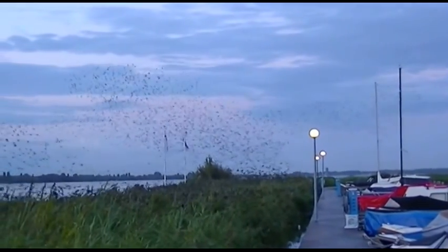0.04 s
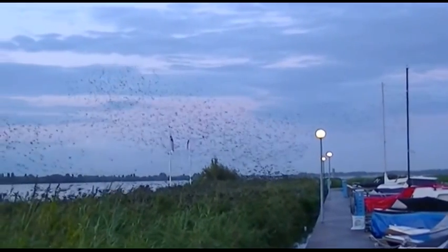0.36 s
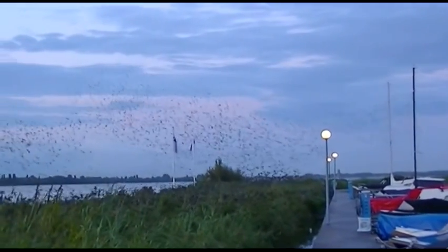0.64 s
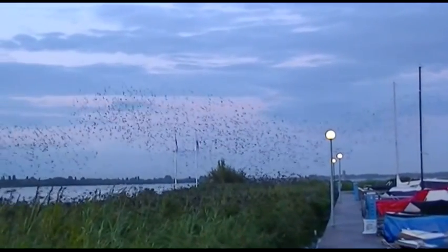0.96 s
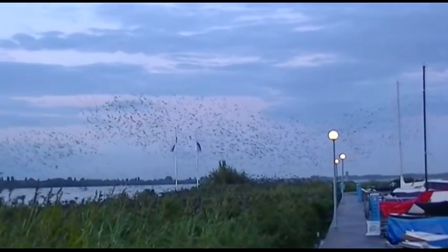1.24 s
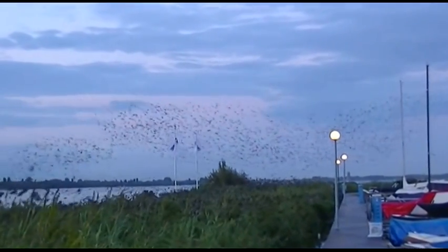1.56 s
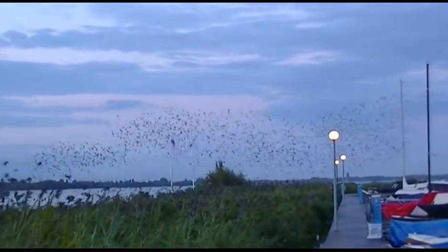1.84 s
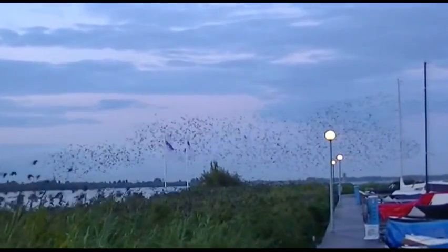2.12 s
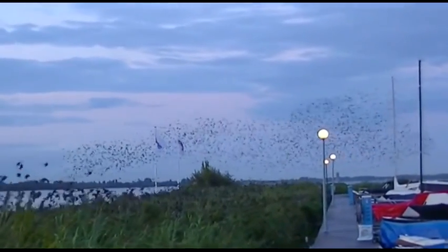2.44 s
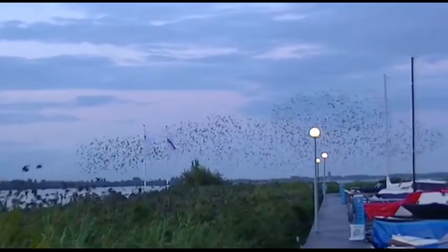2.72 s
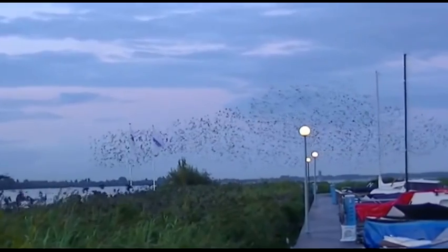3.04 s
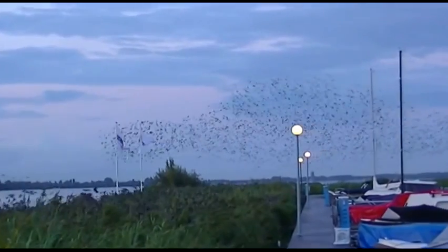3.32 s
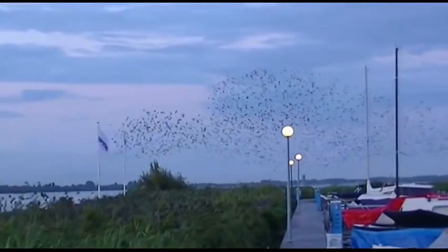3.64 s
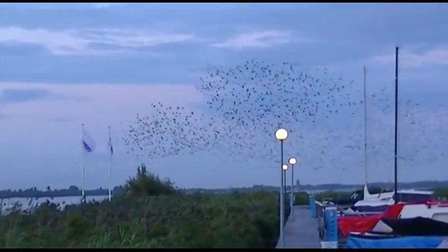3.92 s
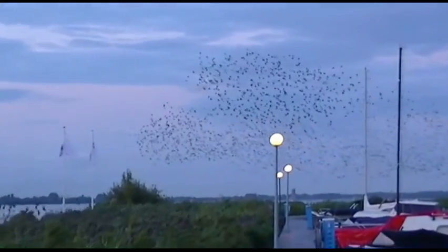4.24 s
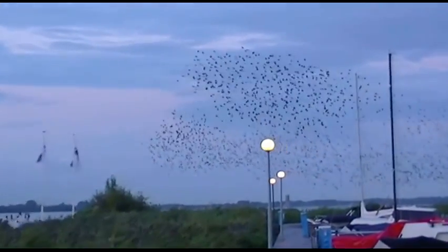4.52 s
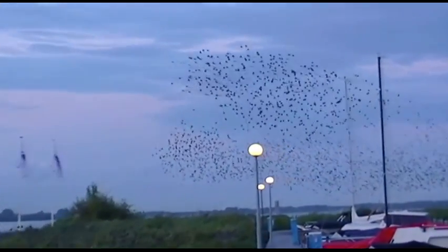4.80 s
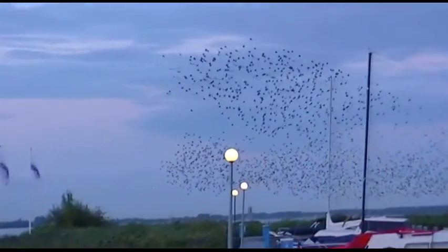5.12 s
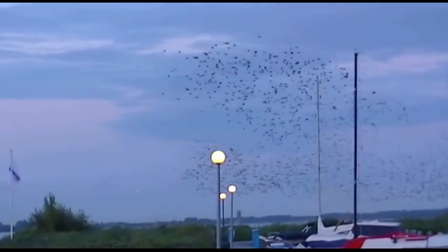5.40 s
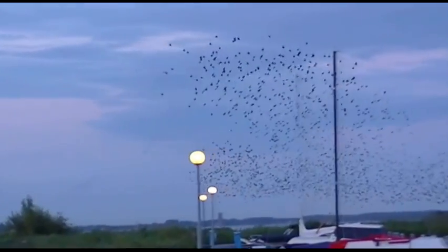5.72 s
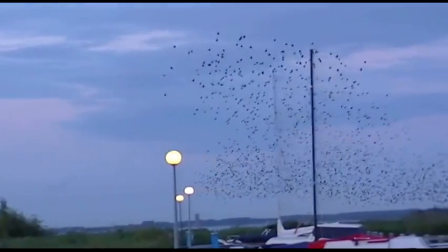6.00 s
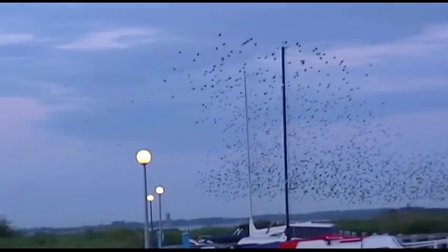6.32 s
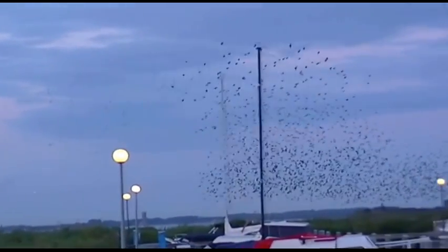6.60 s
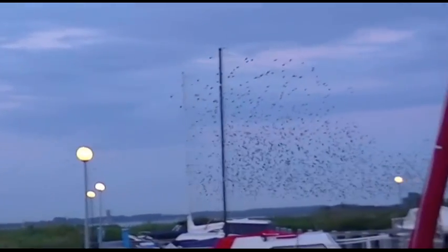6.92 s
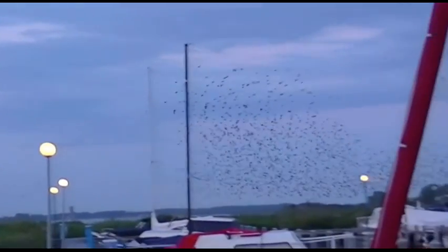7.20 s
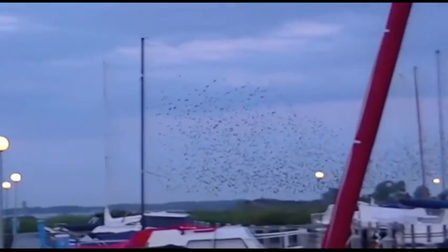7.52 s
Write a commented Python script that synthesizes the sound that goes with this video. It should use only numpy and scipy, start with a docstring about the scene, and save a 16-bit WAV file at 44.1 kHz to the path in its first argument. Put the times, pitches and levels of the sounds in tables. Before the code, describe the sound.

From the start, a huge flock of birds fills the open lakeside air with a dense, continuous rush of wingbeats and hissing feathers, slightly to the left. A few soft wind puffs touch the left of the microphone in the first half second. Thin, very high whistles, quick chirps and buzzy trills from nearer birds come throughout, busier after about 1.5 seconds, over a haze of distant twittering. The hiss and calls swell gently toward 4.6 seconds, then ease a little and drift further left, continuing to the end at nearly 8 seconds. Something hard snaps right beside the microphone three times: lightly at about 2.1 seconds, loudly and sharply at 3.3, and more dully at 4.8. A very faint motor hums far across the water from about 3 to 5.5 seconds.

```python
"""Starling flock from a lakeside jetty

A huge flock sweeps past, a little left of the microphone. Thousands of wingbeats merge into a rush of
pushed air and hissing feathers; the nearer birds whistle and trill above a haze of far calls.
Something hard snaps now and then right beside the microphone, a motor hums far across the water,
and a light wind nudges the microphone ports."""
import sys
import numpy as np
from scipy import signal
from scipy.fft import rfft, irfft, next_fast_len
from scipy.io import wavfile
from scipy.ndimage import uniform_filter1d

SR = 44100
rng = np.random.default_rng(int(sys.argv[2]) if len(sys.argv) > 2 else 0)


def put_to_file(sound):
    """Save the sound as 16-bit audio at rate SR, in the file named by the first command-line argument."""
    columns = np.atleast_2d(sound).T  # one column per channel
    safe = np.clip(columns, -1, 1)
    whole_steps = np.round(safe * 32767)
    wavfile.write(sys.argv[1], SR, whole_steps.astype(np.int16))


N = 341775
TIME = np.arange(N) / SR

# spectrum of the wing strokes: (frequency [Hz], relative level [dB])
STROKE_SPECTRUM = [(24, -63), (40, -31.5), (286, -7.5), (390, -8), (430, -5.5), (757, 0), (975, -0.5),
                   (1280, -4.5), (2250, -1.5), (3200, -5), (3660, -13.5), (4200, -8), (5460, -26),
                   (9240, -120)]
# spectrum of the feather hiss and the sheen above it: (frequency [Hz], relative level [dB])
HISS_SPECTRUM = [(1760, -39), (3000, 1), (3620, -13), (4710, 0.5), (5950, 2.5), (8420, -5.5), (9020, -7.5),
                 (11100, -22), (15700, -32.5)]
# the rustle rises and falls as knots of birds bank by: (time [s], relative level [dB])
BANKING_RUSTLE = [(0.0, -41.5), (3.69, -41), (3.91, -39.5), (4.62, -41), (5.83, -40.5), (6.35, -42.5),
                  (6.73, -41.5), (7.1, -42.5), (7.75, -41.5)]
# thin high whistles, close by: (time [s], length [s], start pitch [Hz], end pitch [Hz], level [dB])
NEAR_WHISTLES = [(0.804, .05, 8600, 8350, -45), (0.928, 0.068, 8200, 8450, -47),
                 (1.62, 0.097, 8250, 8200, -46), (2.162, 0.19, 8800, 8550, -50),
                 (2.29, 0.042, 8800, 8800, -43), (2.328, 0.23, 8370, 8200, -51),
                 (2.393, 0.13, 7860, 7100, -40.5), (2.516, 0.054, 7370, 7250, -46),
                 (3.322, 0.22, 8600, 8300, -51), (3.76, 0.12, 8960, 8840, -46),
                 (3.792, .17, 8100, 7980, -42), (3.992, 0.12, 8660, 8300, -40.5),
                 (4.13, 0.055, 9400, 9400, -61), (4.704, 0.081, 8260, 8760, -42.5),
                 (4.827, .19, 7900, 7390, -42), (4.869, .17, 8860, 8600, -51), (5.43, .13, 9000, 9350, -55),
                 (5.892, 0.13, 8530, 8100, -47.5), (6.225, 0.21, 8670, 8050, -43),
                 (6.252, 0.09, 7950, 7400, -43), (6.272, 0.19, 9270, 9560, -48),
                 (6.48, 0.12, 8400, 8200, -47), (6.688, 0.067, 8230, 8200, -45),
                 (6.839, 0.11, 8740, 8730, -44.5), (7.373, .13, 9200, 9400, -58),
                 (7.584, 0.15, 9040, 8570, -47), (7.597, .09, 8450, 8440, -49)]
# quick slurs, scoops and hooks, close by:
# (time [s], length [s], start pitch [Hz], middle pitch [Hz], end pitch [Hz], level [dB])
NEAR_SLURS = [(.44, 0.043, 6600, 7200, 7600, -44), (.705, 0.028, 4400, 5280, 6100, -47),
              (1.802, 0.055, 5900, 6550, 7550, -41.5), (2.288, .06, 5800, 7130, 7600, -38.5),
              (2.366, .035, 6400, 7300, 7950, -39), (2.724, 0.024, 8000, 8260, 8100, -41),
              (2.735, 0.085, 6100, 5620, 5750, -39.5), (2.811, .055, 5750, 6700, 7200, -39),
              (2.994, .021, 4420, 5200, 6370, -37.5), (3.014, .035, 6350, 5930, 5750, -39.5),
              (3.163, .04, 9000, 7820, 6950, -40), (3.255, 0.052, 7150, 7630, 7240, -43),
              (3.328, 0.027, 6600, 7300, 6460, -38.5), (3.961, 0.17, 6250, 5630, 5500, -40.5),
              (4.101, .075, 5050, 4740, 4660, -42), (4.442, .016, 6650, 5960, 5500, -39),
              (4.711, .063, 4970, 4650, 4560, -43), (5.011, 0.094, 7800, 6300, 5840, -41.5),
              (5.18, 0.053, 6100, 6100, 7100, -38.5), (5.39, 0.094, 5780, 5900, 6400, -39),
              (5.862, 0.09, 6000, 5510, 5250, -37), (6.115, .05, 8000, 7650, 7550, -44),
              (6.153, 0.061, 5400, 5000, 4900, -48), (6.53, 0.046, 7000, 6900, 6700, -45),
              (7.314, 0.037, 4450, 4280, 4900, -43), (7.348, 0.048, 4480, 4420, 4650, -46),
              (7.485, 0.026, 4400, 4500, 4350, -44), (7.53, 0.021, 7100, 7250, 7300, -42),
              (7.547, 0.035, 7750, 8350, 8750, -41)]
# buzzes and warbles, close by; a positive swing stresses the falling sweeps, a negative one the rising:
# (time [s], length [s], start pitch [Hz], end pitch [Hz], level [dB], trill rate [Hz], swing [Hz])
NEAR_TRILLS = [(.005, .04, 4080, 4760, -46, 91, 463), (0.246, 0.026, 6000, 6640, -45, 110, 600),
               (1.519, .1, 6230, 5540, -42.5, 141, 350), (1.705, 0.095, 7200, 6880, -40.5, 66.5, 480),
               (2.86, .11, 7250, 7020, -41, 65, 260), (3.2, 0.056, 6950, 7100, -46, 33, 150),
               (3.323, .045, 5300, 4680, -42.5, 113, 380), (4.428, 0.15, 8000, 7480, -40.5, 128, 600),
               (4.58, 0.13, 6550, 5750, -37.5, 133.5, -350), (4.657, 0.11, 7500, 7750, -43, 130, 550),
               (4.672, 0.058, 5280, 4800, -39, 134, -300), (4.682, 0.055, 9900, 9600, -49, 136, -330),
               (5.126, 0.06, 6680, 6430, -40, 45, 380), (5.32, 0.26, 7560, 7430, -41, 34.05, 200),
               (5.737, 0.11, 7660, 6160, -40.5, 111, 262), (5.829, .065, 6550, 5950, -36.5, 111, 340),
               (6.585, .115, 7400, 7700, -43, 60, 170), (6.792, 0.085, 5650, 5200, -43, 110, 360),
               (7.247, 0.044, 5700, 6900, -42, 122, -480), (7.31, 0.055, 5880, 7280, -41, 121, -380),
               (7.275, 0.048, 4600, 4870, -44, 65, -340)]
# snaps beside the microphone: (time [s], peak level [dB], left minus right [dB], upper band edge [Hz])
CLOSE_SNAPS = [(2.096, -25, 0, 11000), (3.3026, -7.5, -4, 13400), (4.8436, -18.5, -6, 6030)]
# resonances of the snapping thing: (frequency [Hz], bandwidth [Hz], relative level [dB])
SNAP_RESONANCES = [(1200, 180, -8.5), (1615, 120, -8), (2135, 175, -2), (2640, 260, 2), (3230, 180, -3.5),
                   (4060, 220, -10.5), (5250, 340, 1), (5570, 350, -3), (6700, 450, -21), (7380, 450, 0),
                   (7640, 440, -17), (9500, 700, -11)]
# a motor far across the water: (time [s], pitch [Hz], level [dB])
MOTOR_HUM = [(2.5, 432, -80), (2.9, 424.4, -55), (3.8, 434, -54.5), (4.6, 440, -66), (5.3, 442.6, -56.5),
             (6.0, 443, -79)]
# wind puffs on the left microphone port: (time [s], half length [s], peak before filtering [dB])
WIND_PUFFS = [(0.183, 0.018, -37), (0.294, 0.005, -36), (0.324, 0.0055, -30), (0.367, 0.015, -44)]
# the microphone housing ripples the presence range: (frequency [Hz], gain [dB])
HOUSING_RESPONSE = [(2700, -1), (3200, -0.4), (3550, 2.5), (4020, 1), (4350, 3.5), (4800, 0)]


def wings(near, pan_db, air_db=-42.5, rustle_db=-40, hiss_db=-40.5, pass_db=3, ebb_db_per_s=0.16):
    """Each downstroke pushes a puff of air, the feathers rustle, and air hisses through the tips."""
    air = band(colour(wide_noise(side_db=-17.5), STROKE_SPECTRUM), 81, 1286)
    air *= flapping(stroke_s=0.0047, spread_db=-2.0, count=700)
    skim_db = 2.5 * nearness(at_s=2.11, width_s=0.18)  # a low group skims the reeds close by
    air = unit(air) * undb(air_db + skim_db)
    rustle = band(colour(wide_noise(side_db=-16), STROKE_SPECTRUM), 1342, 3840)
    rustle *= flapping(stroke_s=0.0016, spread_db=0.0, count=1400)
    banking_db = np.interp(TIME, *np.transpose(BANKING_RUSTLE))
    rustle = unit(rustle) * undb(rustle_db + banking_db - banking_db.mean())
    ebb_db = -ebb_db_per_s * (TIME - TIME.mean())  # the hiss ebbs as the birds climb
    hiss = unit(feather_hiss(pan_db)) * undb(hiss_db + pass_db * near + ebb_db)
    return (air + rustle) * pan(.17 * pan_db) + hiss


def feather_hiss(pan_db, low_ebb_db_per_s=0.26):
    """Hiss of air through feather tips, with a faint high sheen above it."""
    edges_hz = [3600, 4500, 5500, 6800, 8400]
    size = next_fast_len(N)
    hz = np.fft.rfftfreq(size, 1 / SR)
    spectrum = rfft(colour(wide_noise(side_db=-17.0), HISS_SPECTRUM), size)
    ranges = []
    for lo_hz, hi_hz in zip(edges_hz, edges_hz[1:]):
        inside = (hz >= lo_hz) & (hz < hi_hz)
        ranges.append(irfft(spectrum * inside, size)[:, :N] * swell(depth_db=2.26, rate_hz=9))
    hiss = ranges[0] * undb(-low_ebb_db_per_s * (TIME - TIME.mean())) + sum(ranges[1:])
    sheen = band(colour(wide_noise(side_db=-36), HISS_SPECTRUM), edges_hz[-1], 18000, order=10)
    sheen *= swell(depth_db=1.2, rate_hz=12)
    return (hiss * pan(pan_db) + sheen) * flapping(stroke_s=0.00052, spread_db=3.0, count=2800)


def flapping(stroke_s, spread_db, count, beat_hz=12, near_s=1.0):
    """Flutter of many wings: each bird beats at its own rate, loudest when nearest the microphone."""
    pace, strength = np.hsplit(rng.standard_normal((count, 2)), 2)
    nearest_s = rng.uniform(-1, TIME[-1] + 1, (count, 1))
    beats = np.arange(-12, 13) + 0.0845 * rng.standard_normal((count, 25))
    offset_s = beats / (beat_hz * np.exp(.12 * pace))
    power = undb(spread_db * np.clip(strength, -2, 2)) ** 2 / (1 + (offset_s / near_s) ** 2) ** 2
    onsets = ((nearest_s + offset_s) * SR).astype(int)
    inside = (onsets >= 0) & (onsets < N)
    strokes = np.bincount(onsets[inside], power[inside], N)
    age = TIME[:SR // 10] / stroke_s
    total = np.abs(signal.fftconvolve(strokes, age * np.exp(-age))[:N])
    # the strokes add in power; only their quick flutter is kept
    return np.sqrt(total / uniform_filter1d(total, SR // 4))


def swell(depth_db, rate_hz):
    """Slow random rise and fall in loudness."""
    knots = np.arange(0, TIME[-1] + 1, 1 / rate_hz)
    drift = np.interp(TIME, knots, rng.standard_normal(len(knots)))
    return undb(depth_db * uniform_filter1d(drift, SR // 10))


def nearness(at_s, width_s):
    """Inverse square law for a straight fly-by: 1 at the nearest point, half at width_s either side."""
    return 1 / (1 + ((TIME - at_s) / width_s) ** 2)


def near_calls():
    """Whistles, slurs and buzzy trills of the birds closest to the jetty."""
    track = np.zeros(N)
    for s, length_s, start_hz, end_hz, db in NEAR_WHISTLES:
        add(track, s, undb(db) * whistle(length_s, start_hz, end_hz))
    for s, length_s, start_hz, middle_hz, end_hz, db in NEAR_SLURS:
        add(track, s, undb(db) * slur(length_s, start_hz, middle_hz, end_hz))
    for s, length_s, start_hz, end_hz, db, rate_hz, swing_hz in NEAR_TRILLS:
        add(track, s, undb(db) * trill(length_s, start_hz, end_hz, rate_hz, swing_hz))
    return track


def whistle(length_s, start_hz, end_hz, scoop_hz=450, scoop_s=0.0091, arch_hz=79.8):
    """A thin, slightly rough note that scoops up to its pitch and arches over."""
    way = progress(length_s)
    glide = start_hz + (end_hz - start_hz) * way
    arch = arch_hz * np.sin(np.pi * way)
    scoop = scoop_hz * np.exp(-way * length_s / scoop_s)
    return call(glide + arch - scoop, swing_hz=45, trill_hz=109.3, waver_hz=37.2, flutter_db=1.5)


def slur(length_s, start_hz, middle_hz, end_hz, husk=.11):
    """A note that bends through three pitches; the further it climbs, the huskier it gets."""
    line_hz = pitch_curve(length_s, [start_hz, middle_hz, end_hz])
    swing_hz = 60 + husk * max(end_hz - start_hz, 0)
    return call(line_hz, swing_hz, trill_hz=135, waver_hz=45, flutter_db=1.0)


def trill(length_s, start_hz, end_hz, rate_hz, swing_hz):
    """A buzz on a sliding pitch."""
    return call(start_hz + (end_hz - start_hz) * progress(length_s), swing_hz, rate_hz)


def call(line_hz, swing_hz, trill_hz, waver_hz=55, flutter_db=2.5, edge_s=0.0067,
         uneven=0.184, hoarse=0.35):
    """One thin note: an uneven trill swings it about its pitch line, and pitch and loudness waver."""
    t = TIME[:len(line_hz)]
    knots = np.arange(0, 1, 1 / 250)
    chance = rng.standard_normal((5, len(knots)))
    waver, flutter, hurry = (np.interp(t, knots, row) for row in chance[:3])
    # slower changes, as the flying bird turns and beats its wings
    bend, turn = (np.interp(t, 8 * knots, row) for row in chance[3:])
    trill_phase = 2 * np.pi * np.cumsum(trill_hz * (1 + uneven * hurry)) / SR
    stray_hz = (waver_hz + hoarse * abs(swing_hz)) * waver + waver_hz * bend
    hz = line_hz + swing_hz * np.sin(trill_phase) + stray_hz
    tone = np.sin(2 * np.pi * np.cumsum(hz) / SR)
    # a deep trill breaks into pulses, one for each sweep
    pulse = 1 - np.clip(abs(swing_hz) / 650, 0, 1) * np.cos(trill_phase)
    fade = np.sin(np.pi / 2 * np.clip(np.minimum(t, t[-1] - t) / edge_s, 0, 1))
    return unit(fade * pulse * undb(flutter_db * (flutter + 0.5 * turn)) * tone)


def far_calls(count, pitch_hz, spread, max_swing_hz, base_db):
    """Further out, the rest of the flock calls at random, too faint to be told apart."""
    track = np.zeros(N)
    for when, length, pitch, bend, slope, depth, rate in rng.random((count, 7)):
        hz = pitch_hz * np.exp(spread * (pitch - .5))
        pitches_hz = hz * np.exp(.3 * spread * np.array([slope - .5, bend - .5, .5 - slope]))
        line_hz = pitch_curve(.05 + 0.15 * length, pitches_hz)
        note = call(line_hz, max_swing_hz * depth, trill_hz=40 + 100 * rate)
        add(track, when * TIME[-1], undb(base_db) * note)
    return track


def scatter(x, scatter_db, count=14, reach_s=.025):
    """Early echoes off water and hulls blur each note and make it come and go."""
    lags = (rng.random(count) * reach_s * SR).astype(int)
    gains = rng.standard_normal(count)
    echoes = sum(gain * np.pad(x, (lag, 0))[:N] for lag, gain in zip(lags, gains))
    return (x + undb(scatter_db) * echoes / np.linalg.norm(gains)) / np.hypot(1, undb(scatter_db))


def shore(x, t60_s=0.23, wet_db=-12):
    """Reeds, boats and water around the jetty scatter a faint stereo tail."""
    t = TIME[:SR]
    tail = rng.standard_normal((2, len(t))) * np.exp(-np.log(1000) * t / t60_s)
    tail /= np.sqrt(np.sum(tail ** 2, axis=1, keepdims=True))
    return x + undb(wet_db) * signal.fftconvolve(x[None], tail.mean(axis=0) + tail / 2, axes=1)[:, :N]


def snaps(crack_s=0.0012, crack_db=-14, rise_s=0.00045, drive=1.7,
          echo_s=0.00205, echo_db=-11, late_db=-14):
    """Hard little contacts ring briefly beside the microphone; a close surface echoes each twice."""
    t = TIME[:SR // 20]
    # neighbouring modes swing in opposite directions
    ring = sum((-1) ** k * undb(db) * np.exp(-np.pi * width_hz * t) * np.sin(2 * np.pi * hz * t)
               for k, (hz, width_hz, db) in enumerate(SNAP_RESONANCES))
    ring *= 1 - np.exp(-t / rise_s)
    out = 0
    for s, db, pan_db, bright_hz in CLOSE_SNAPS:
        crack = rng.standard_normal(len(t)) * np.exp(-t / crack_s)
        hit = ring / np.abs(ring).max() + undb(crack_db) * band(crack, 1300, 8500, order=2)
        hit = band(np.tanh(drive * hit), 600, bright_hz, order=3)  # rounded peaks
        hit /= np.abs(hit).max()
        track = np.zeros(N)
        add(track, s, hit)
        add(track, s + echo_s, undb(echo_db) * hit)
        add(track, s + 2 * echo_s, undb(late_db) * band(hit, 900, 3200, order=2))  # duller second echo
        out = out + track * undb(db) * pan(pan_db)
    return out


def motor(waver_hz=5.1, octave_db=-4):
    """Far across the water, a faint hum and its octave dip, then creep up in pitch."""
    s, hz, db = np.transpose(MOTOR_HUM)
    waver = unit(band(rng.standard_normal(N), 0.94, 6.9, order=1))
    phase = 2 * np.pi * np.cumsum(np.interp(TIME, s, hz) + waver_hz * waver) / SR
    return unit(np.sin(phase) + undb(octave_db) * np.sin(2 * phase)) * undb(np.interp(TIME, s, db))


def wind(rumble_db=-72, puff_pan_db=22):
    """Low rumble, unrelated at the two microphone ports, and a few puffs that catch the left one."""
    rumble = unit(band(rng.standard_normal((2, N)), 47, 480, order=2)) * undb(rumble_db) * pan(0.83)
    eddies = band(rng.standard_normal(N), 92, 290)
    puffs = np.zeros(N)
    for s, half_s, db in WIND_PUFFS:
        puff = eddies * np.exp(-((TIME - s) / half_s) ** 2 / 2)
        puffs += undb(db) * puff / np.abs(puff).max()
    return rumble + band(puffs, 65, 600, order=2) * undb([[0], [-puff_pan_db]])


def progress(length_s):
    """Runs from 0 to 1 over one note of at least 20 ms."""
    return np.linspace(0, 1, int(max(length_s, .02) * SR))


def pitch_curve(length_s, pitches_hz):
    """A parabola through a note's start, middle and end pitches."""
    return np.polyval(np.polyfit([0, .5, 1], pitches_hz, 2), progress(length_s))


def wide_noise(side_db):
    """Stereo white noise: mostly shared by both channels, a little opposed."""
    mid, side = rng.standard_normal((2, N))
    return mid + undb(side_db) * side * np.array([[1], [-1]])


def colour(x, points):
    """Filter by a curve of (frequency [Hz], gain [dB]) points."""
    hz, db = np.transpose(points)
    size = next_fast_len(N)
    bins = np.maximum(np.fft.rfftfreq(size, 1 / SR), 1)
    gain = undb(np.interp(np.log(bins), np.log(hz), db))
    return irfft(rfft(x, size) * gain, size)[..., :N]


def band(x, lo_hz, hi_hz, order=4):
    """Band-pass between two edges."""
    return signal.sosfilt(signal.butter(order, [lo_hz, hi_hz], "band", fs=SR, output="sos"), x)


def pan(db):
    """Channel gains for a left minus right level difference."""
    return undb(np.array([[.5], [-.5]]) * db)


def undb(db):
    """Decibels to gain."""
    return 10 ** (np.asarray(db) / 20)


def unit(x):
    """Scale to rms 1."""
    return x / np.sqrt(np.mean(x ** 2))


def add(track, s, sound):
    """Mix a sound into a track at a time."""
    start = int(np.clip(s * SR, 0, N))
    track[start:start + len(sound)] += sound[:N - start]


def scene(chorus_pass_db=6.5):
    """From the jetty: hiss and far calls swell as the flock passes, over snaps, motor and wind."""
    near = nearness(at_s=4.6, width_s=2.05)
    pan_db = 1.9 + 0.2 * TIME  # the flock starts a little left and drifts further that way
    rush = wings(near, pan_db)
    far_trills = far_calls(count=260, pitch_hz=6035, spread=.42, max_swing_hz=342, base_db=-55.5)
    far_whistles = far_calls(count=200, pitch_hz=8110, spread=.26, max_swing_hz=60, base_db=-59)
    halfway_chatter = far_calls(count=45, pitch_hz=7310, spread=.33, max_swing_hz=223, base_db=-53.0)
    chorus = (far_trills + far_whistles + halfway_chatter) * undb(chorus_pass_db * near)
    calls = scatter(near_calls(), scatter_db=-17) + scatter(chorus, scatter_db=-4.5)
    voices = shore(calls) * pan(0.2 * pan_db)
    return rush + voices + snaps() + motor() + wind()


def record(dry):
    """The microphone housing colours the sound, and a steep low-pass cuts the top."""
    top_hz = 15800
    low_pass = signal.ellip(10, .2, 70, top_hz, fs=SR, output="sos")
    return signal.sosfilt(low_pass, colour(dry, HOUSING_RESPONSE))


dry = scene()
out = record(dry)
put_to_file(out)
```